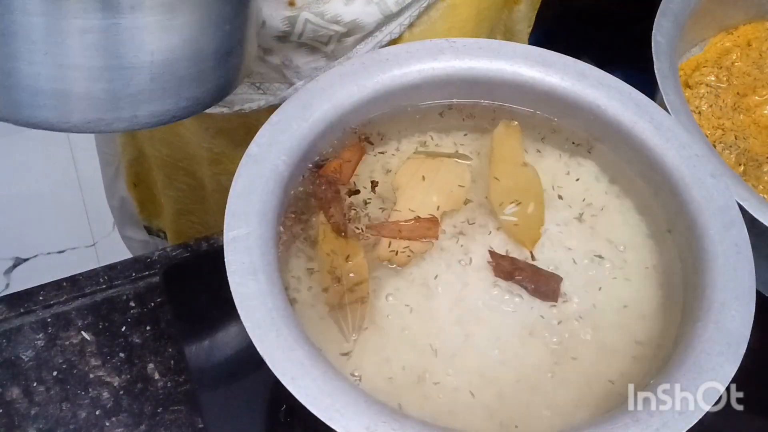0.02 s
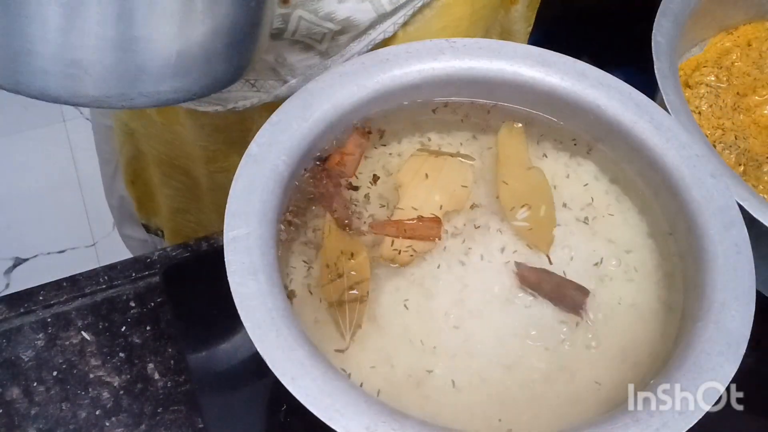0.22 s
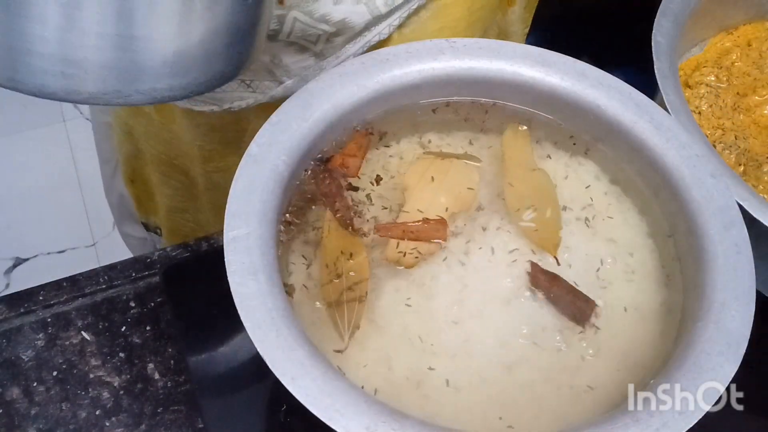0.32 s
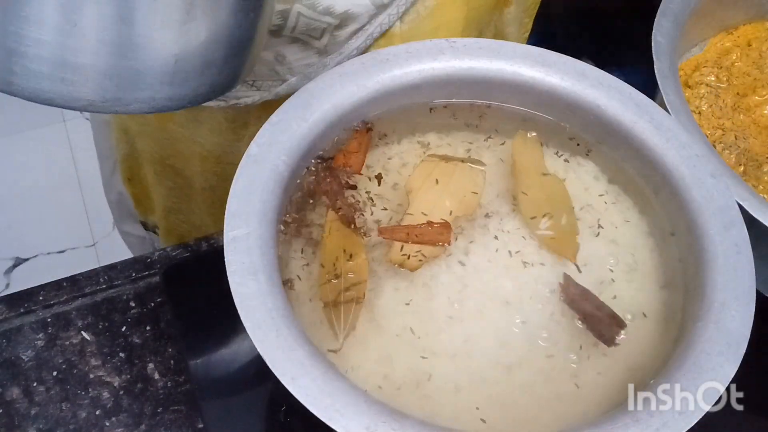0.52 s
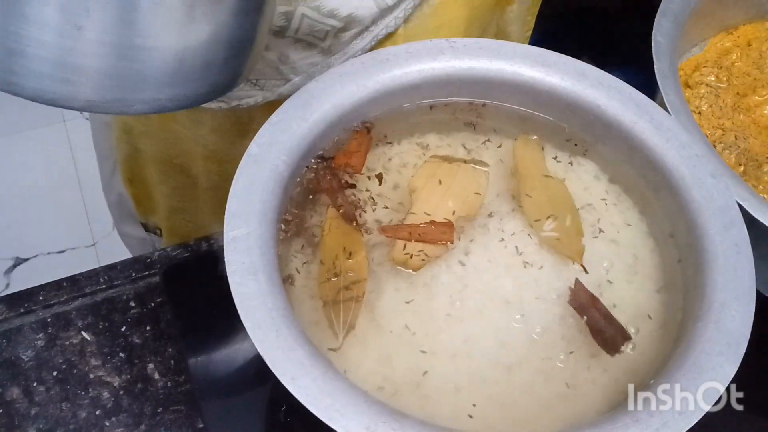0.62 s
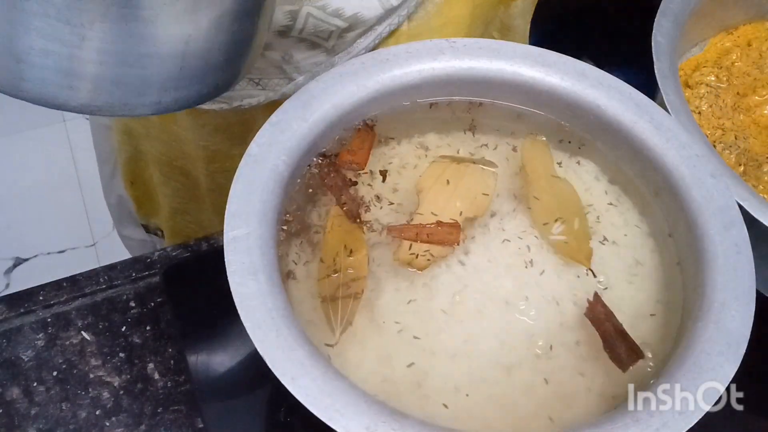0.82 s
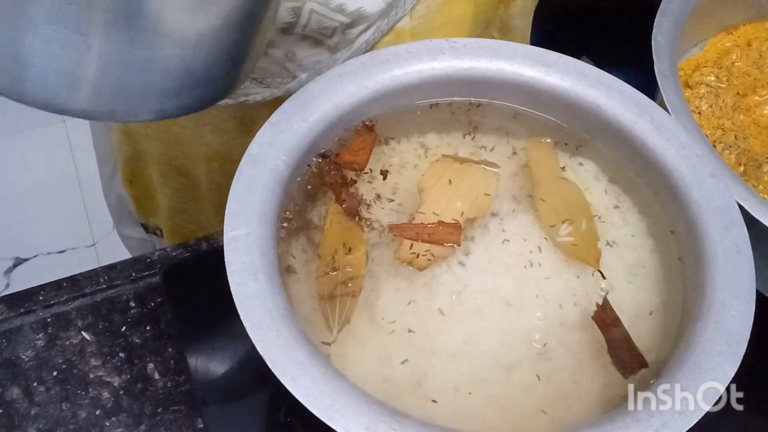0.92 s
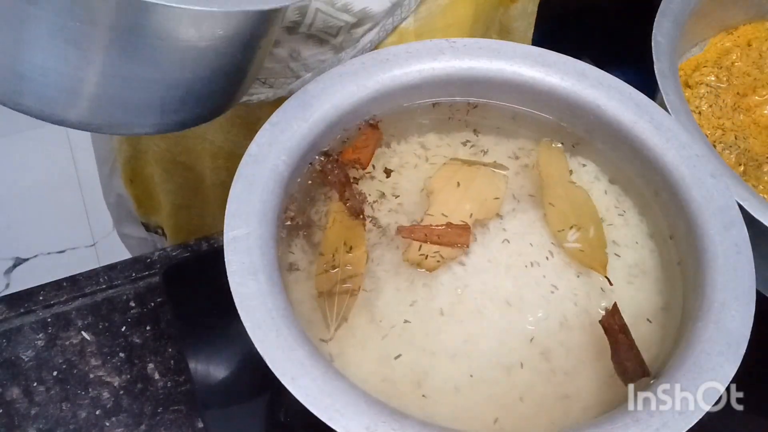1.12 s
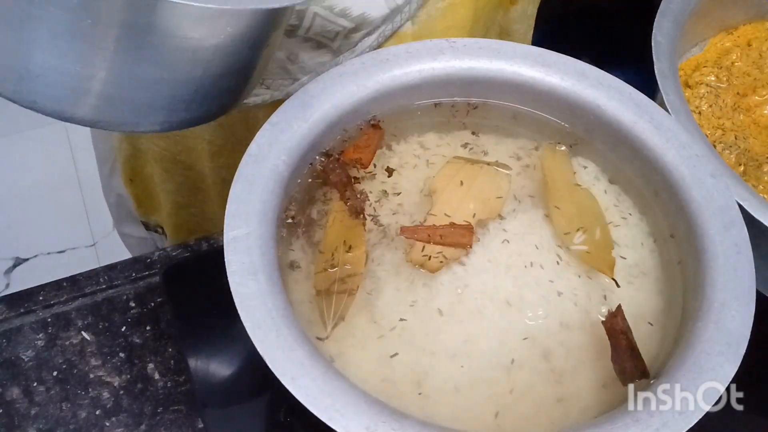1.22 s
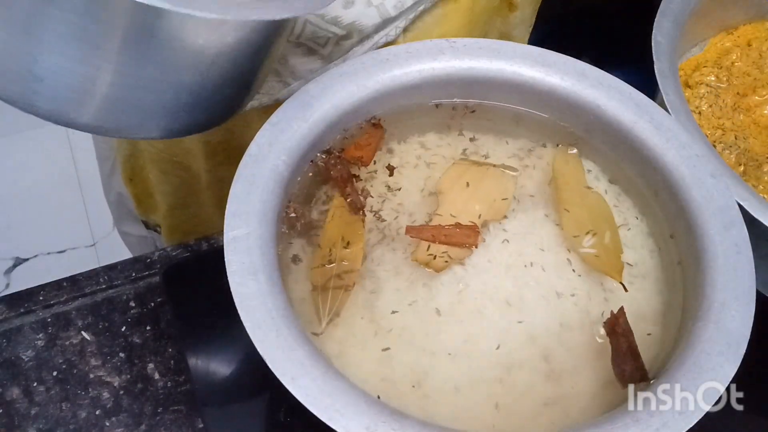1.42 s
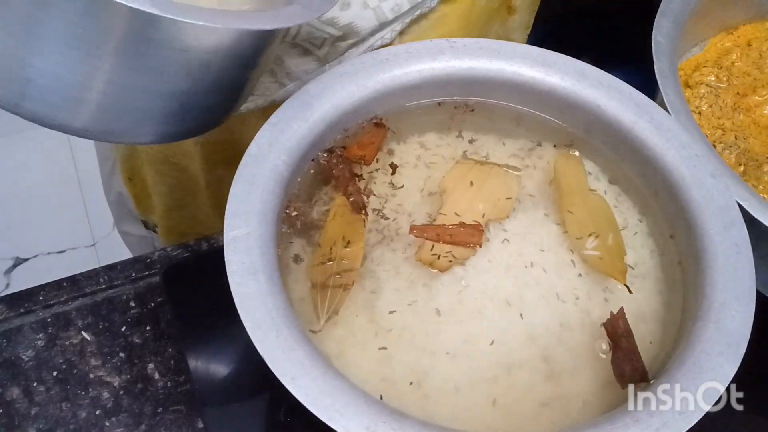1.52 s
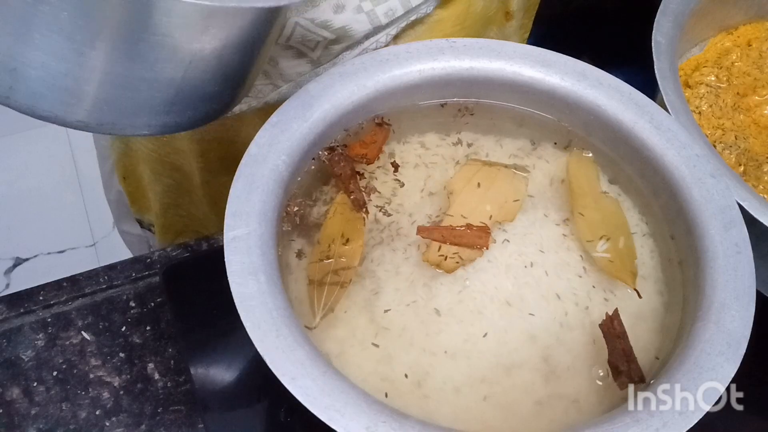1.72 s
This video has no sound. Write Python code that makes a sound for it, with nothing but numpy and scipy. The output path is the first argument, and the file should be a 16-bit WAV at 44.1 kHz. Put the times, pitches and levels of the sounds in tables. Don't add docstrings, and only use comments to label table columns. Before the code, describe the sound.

Metal pot knocked and dragged across a stone worktop, ringing briefly over a low throbbing rumble

```python
import sys
import numpy as np
from scipy import signal
from scipy.fft import rfft, irfft
from scipy.io import wavfile
from scipy.ndimage import uniform_filter1d

SR = 44100
rng = np.random.default_rng(int(sys.argv[2]) if len(sys.argv) > 2 else 0)


def elevation(decibels):
    levels = np.asarray(decibels, float)
    return 10 ** (levels / 20)


def wrap_up_sound(samples):
    columns = np.atleast_2d(samples).T
    tamed = np.clip(columns, -1, 1)
    steps = np.round(tamed * 32767).astype(np.int16)
    wavfile.write(sys.argv[1], SR, steps)


N = 79380


def even(x):
    return x / np.sqrt(np.mean(x ** 2) + 1e-20)


def read(points, hz):
    f, value = np.transpose(points)
    return np.interp(np.log(hz + 1), np.log(f + 1), value)


def add(mix, start_s, sound):
    part = mix[..., round(start_s * SR):][..., :sound.shape[-1]]
    part += sound[..., :part.shape[-1]]


def colour(x, points):
    log_gain = read(points, abs(np.fft.fftfreq(4096, 1 / SR))) * np.log(10) / 20
    taps = np.fft.ifft(np.exp(np.conj(signal.hilbert(log_gain)))).real[:2048]
    return signal.fftconvolve(x, taps)[:len(x)]


def resonate(x, hz, width_hz):
    turn = np.exp(2j * np.pi * np.cumsum(hz * np.ones(len(x))) / SR)
    r = np.exp(-np.pi * abs(width_hz) / SR)
    return 2 * (turn * signal.lfilter([1 - r], [1, -r], x / turn)).real


# pitch_hz, correlation [-1 to 1]
LIKENESS = [(60, 0.99), (300, 0.88), (640, 0.62), (1400, -0.087), (3000, -0.054)]


def pair(a, b):
    same = np.clip(read(LIKENESS, np.fft.rfftfreq(len(a), 1 / SR)), -1, 1)
    right = irfft(same * rfft(a) + np.sqrt(1 - same ** 2) * rfft(b), len(a))
    return np.array([a, right])


# pitch_hz, t60_s
ROOM_DECAY = [(200, 0.6), (600, 0.41), (1500, 0.51), (4000, 0.43), (9000, 0.32), (15000, 0.21)]


def kitchen(x, wet_db):
    taps = np.zeros((2, SR))
    at = np.arange(60, SR - 20, 20) + rng.integers(0, 20, (2, (SR - 61) // 20))
    np.put_along_axis(taps, at, rng.choice([-1., 1.], at.shape), 1)
    hz, t, bands = signal.stft(pair(*taps), SR, nperseg=128)
    decay = elevation(-60 * t / read(ROOM_DECAY, hz)[:, None])
    tail = signal.istft(bands * decay, SR, nperseg=128)[1]
    tail[:, :60] = 0
    tail = tail / np.linalg.norm(tail[0])
    walls, size = rng.integers(40, 1300, size=8), rng.uniform(-1, 1, size=8)
    for ear in tail:
        ear[walls + rng.integers(0, 16, size=8)] += elevation(-15 - walls / 80) * size
    left_lag_s = 0.00022
    tail[0, round(left_lag_s * SR)] += elevation(-wet_db)
    tail[1, 0] += elevation(-wet_db)
    return signal.fftconvolve(x[None], tail, axes=1)[:, :N]


# pitch_hz, density_db [dB per Hz]
ROOM_TONE = [(30, 6), (81, 1.5), (600, -15), (1800, -24), (2400, -36), (3680, -30), (8500, -30),
             (12500, -25), (15500, -32)]
# time_s, pitch_hz, level_db
WHISTLE = [
    (0., 1537, -64.5),
    (.1, 1516, -69),
    (.2, 1640, -60.5),
    (.6, 1670, -86),
    (.67, 1850, -58.5),
    (1.4, 1740, -69),
    (1.6, 1900, -82),
    (1.8, 1890, -70),
]


def air():
    tone_a, tone_b, lump_a, lump_b, jet_a, jet_b = rng.standard_normal((6, N))
    t = np.arange(N) / SR
    tone = elevation(-55.5) * even(pair(colour(tone_a, ROOM_TONE), colour(tone_b, ROOM_TONE)))

    rumble_hz, rumble_width_hz = 78.6, 37
    lumps = [resonate(resonate(v, rumble_hz, rumble_width_hz), rumble_hz, 33) for v in (lump_a, lump_b)]
    rumble = elevation(-58) * (np.sin(2 * np.pi * rumble_hz * t) + 0.22 * even(pair(*lumps)))
    throb_db = 5 * np.cos(2 * np.pi * 5.12 * (t - 0.29))
    quiet_start_db = -10 * np.clip((0.26 - t) * 20, 0, 1)
    rumble *= elevation(throb_db + quiet_start_db + 5 - 5.5 * t)

    time_s, pitch_hz, level_db = np.transpose(WHISTLE)
    path = np.interp(t, time_s, pitch_hz)
    whistle = even(np.array([resonate(resonate(v, path, 92), path, 270) for v in (jet_a, jet_b)]))
    return tone + rumble + elevation(np.interp(t, time_s, level_db)) * whistle


# start_s, level_db, pitch_hz, width_hz, length_s
TICKS = [(0., -82.5, 3450, 1210, 0.0059), (0.168, -76.5, 3900, 2400, 0.012),
         (0.408, -67, 4600, 5130, 0.0025), (0.773, -48.5, 11600, 6000, 0.0012),
         (0.8075, -45, 7450, 9000, 0.0015), (0.968, -54.5, 6900, 9900, 0.0006),
         (1.337, -63, 10100, 6200, 0.0027), (1.457, -67.5, 6000, 4000, 0.0065),
         (1.467, -64.5, 1700, 1340, 0.0067), (1.567, -68.5, 6000, 7000, 0.003),
         (1.574, -71.5, 650, 310, 0.0032), (1.624, -66, 2130, 1260, 0.018), (1.747, -76, 1990, 410, 0.0062)]


def tick(level_db, pitch_hz, width_hz, length_s):
    t = np.arange(SR // 2) / SR
    noise = rng.standard_normal(len(t)) * t * np.exp(-t / length_s)
    puff = resonate(noise, pitch_hz, width_hz)
    return elevation(level_db) * even(resonate(puff, pitch_hz, 2 * width_hz))


def chirp():
    t = np.arange(SR // 4) / SR
    pitch_hz = 3610 + 500 * np.exp(-t / 0.012)
    fade = np.minimum(t / 0.025, 1) * elevation(-68 - 60 * t / 0.19)
    return fade * np.sin(2 * np.pi * np.cumsum(pitch_hz) / SR)


# start_s, level_db, rattle_s, ring_db, room_db, rattle_db
BLOWS = [
    (0.2182, -35, 0.0041, -9.5, 5, -12.5),
    (0.6751, -40, 0.0021, -9.5, 6, -4.5),
    (0.7532, -33, 0.0053, -5, 10, -14),
]
# pitch_hz, density_db [dB per Hz]
CRACKS = [
    [(120, -79), (200, -22), (450, -10), (1100, -20.5), (1510, -13), (2510, -16.5), (4100, -7.5),
     (15500, -9)],
    [(120, -48), (200, -33), (575, -22.5), (665, -2.5), (812, -35), (1510, -10.5), (1880, -19.5),
     (15500, -13.5)],
    [(120, -25.5), (200, -24.5), (471, -8.5), (596, -17.5), (677, 4.5), (842, -15), (1620, -12),
     (15500, -16.5)],
]
# pitch_hz, level_db, t60_s
RINGS = [
    [(660, 7.5, 0.35), (870, 4.5, 0.32), (1330, 0, 0.44), (1517, 16, 0.15), (1760, 9, .1), (2335, 13, 0.14),
     (3601, 13.5, .25), (3730, 4, 0.14), (4090, 10, 0.3), (4580, 10, 0.18), (4800, 15, .15),
     (5450, 12, 0.19)],
    [(450, 7.5, 0.14), (624, 0, 0.29), (1078, 20, 0.066), (1500, 13.5, 0.18), (3040, 7, .2),
     (4118, -10, .12), (5370, -9, .12), (5900, 17, 0.071)],
    [(332, 9, 0.12), (686, 18, 0.17), (668, -1, 0.58), (956, 4, 0.52), (1190, 6, 0.37), (1359, 10, 0.4),
     (1525, -1.5, 0.42), (1630, 15.5, 0.22), (2410, 2.2, 0.5), (2600, 7, .15), (2952, 11.5, .12),
     (4035, -2, 0.34)],
]


def blow(level_db, rattle_s, ring_db, room_db, rattle_db, crack, ring):
    t = np.arange(SR // 2) / SR
    contact = kitchen(even(colour(1. * (t == 0), crack)), room_db)

    rattles_per_s, close_db = 5500, -15
    draw = rng.random((len(t), 2))
    hits = (draw[:, 0] < rattles_per_s / SR) * (2 * draw[:, 1] - 1) * np.exp(-t / rattle_s)
    rattle = elevation(rattle_db + close_db) * kitchen(even(colour(hits, crack)), close_db)

    modes = np.zeros(len(t))
    for pitch_hz, mode_db, t60_s in ring:
        waver = 1 + 0.35 * even(uniform_filter1d(rng.standard_normal(len(t)), size=500))
        modes += elevation(mode_db - 60 * t / t60_s) * np.sin(2 * np.pi * pitch_hz * t) * waver
    ring_wet_db = -4
    ringing = elevation(ring_db + ring_wet_db) * even(modes * np.minimum(t / 0.0014, 1))
    return elevation(level_db) * (contact + rattle + kitchen(ringing, ring_wet_db))


# time_s, pressure_db, floor_weight_db, hollow_hz [air under the pot]
DRAGS = [
    [(.325, -64, 18, 450), (.35, -54.5, 8, 480), (.39, -45.5, 7.5, 910), (.415, -31, -4.5, 1080),
     (.44, -47, -47, 1490), (.47, -33.5, -4, 1320), (.5, -111, -15, 970), (.54, -108, 4, 960)],
    [(.967, -37.5, -1, 1180), (.975, -43, -6.5, 1190), (1.04, -40.5, -7.5, 1520), (1.1, -44.5, -6, 1540),
     (1.14, -41.5, -5, 1250), (1.19, -42, -4, 1674), (1.225, -40.5, 8.5, 1415), (1.31, -45, -5.5, 1650),
     (1.36, -71, -28, 1500)],
]
# pitch_hz, width_hz, level_db
FLOORS = [
    [(277, 20, -9), (328, 14, -3.5), (530, 26, -3), (687, 25, 1), (751, 25, -6.5)],
    [(472, 19, -8.5), (528, 44, -7), (578, 63, -6.5), (637, 40, -3), (720, 97, -6.5)],
]
# pitch_hz, width_hz, level_db
WALLS = [
    [(934, 26, -6), (1030, 51, 5.8), (1230, 19, 2), (1335, 115, 4.5), (1510, 18, -11), (1752, 22, 5),
     (2400, 17, -6), (2915, 120, 1)],
    [(1072, 80, -4.5), (1254, 34, -2.5), (1400, 51, 1.5), (1580, 80, 10), (1710, 79, 1), (2310, 41, 3),
     (2800, 60, -9)],
]
# pitch_hz, density_db [dB per Hz]
GRIT = [
    [(120, -59), (200, -31), (665, -21.5), (842, -10.5), (1380, -15.5), (4920, -20.5), (15500, -28.5)],
    [(120, -44), (200, -36), (554, -8), (728, -30), (842, -13), (1380, -8.5), (15500, -25)],
]


def drag(curve, floor, wall, grit):
    time_s, pressure_db, weight_db, hollow_hz = np.transpose(curve)
    t = np.arange(N) / SR
    slips_per_s, spread_db = 2700, 4.5
    draw = rng.random((N, 3))
    strength = (draw[:, 2] + .03) ** (-spread_db / 20 * np.log(10))
    slips = even((draw[:, 0] < slips_per_s / SR) * np.sign(draw[:, 1] - .5) * strength)
    slips = slips * elevation(np.interp(t, time_s, pressure_db, -150, -150))

    unit = np.zeros(N)
    unit[0] = 1
    bodies = []
    for modes in (floor, wall):
        bodies.append(sum(elevation(d) * (-1) ** k * resonate(unit, f, w) for k, (f, w, d) in enumerate(modes)))
    low, high, rasp = (h / np.linalg.norm(h) for h in bodies + [colour(unit, grit)])
    floor_ring = signal.fftconvolve(slips * elevation(np.interp(t, time_s, weight_db)), low)
    wall_ring = signal.fftconvolve(slips, high + elevation(1.5) * rasp)
    hollow = elevation(12) * resonate(slips, np.interp(t, time_s, hollow_hz), 47)
    return (floor_ring + wall_ring)[:N] + hollow


def shifting(x, wet_db):
    turn = np.pi * np.arange(N) / SR / 0.3017
    return sum(kitchen(x * abs(np.cos(turn + k * np.pi / 3)), wet_db) for k in range(3))


# start_s, level_db, pitch_hz, swell_s
CATCHES = [(0.333, -62, 277, 0.02), (.39, -75, 328, 0.0091), (.4, -41, 646, 0.016), (.4, -36, 530, 0.018),
           (0.399, -55, 1030, 0.013), (0.408, -49, 1765, 0.019), (.47, -47, 910, 0.027),
           (.46, -69, 1230, .012), (.885, -44, 668, 0.01), (0.812, -34, 1520, 0.017),
           (1.025, -40, 1595, 0.0084), (1.05, -41.5, 528, 0.016), (1.225, -47, 1315, .01),
           (1.2, -51, 708, 0.013), (1.22, -39, 642, 0.014), (1.25, -64, 604, 0.012),
           (1.29, -81, 1560, 0.014), (1.3, -41, 692, 0.015)]


def catch(level_db, pitch_hz, swell_s):
    u = np.arange(SR // 4) / SR / swell_s
    return elevation(level_db) * u * np.exp(1 - u) * np.sin(2 * np.pi * pitch_hz * swell_s * u)


def scene():
    mix = air()
    small = np.zeros(N)
    for start_s, *how in TICKS:
        add(small, start_s, tick(*how))
    mix += kitchen(small, 1.5)
    add(mix, 0.064, kitchen(chirp(), -19) * elevation([[-2], [-8]]))
    for (start_s, *how), crack, ring in zip(BLOWS, CRACKS, RINGS):
        add(mix, start_s, blow(*how, crack, ring))
    for parts in zip(DRAGS, FLOORS, WALLS, GRIT):
        mix += elevation(-2.5) * shifting(drag(*parts), 4.5)
    rung = np.zeros(N)
    for start_s, *how in CATCHES:
        add(rung, start_s, catch(*how))
    return mix + elevation(-4) * kitchen(rung, -4)


# pitch_hz, gain_db
LEFT_MIC = [(70, 0.5), (150, -1.6), (700, -1.3), (1500, 3.5), (5000, 4.5), (7200, 2), (8600, -19.5),
            (10500, -3.5)]
# pitch_hz, gain_db
RIGHT_MIC = [(60, -6), (200, -5), (1500, 0), (5000, -0.5), (8600, -3.5), (15000, -0.5)]
# pitch_hz, gain_db
BAND_LIMITS = [(36, -25), (48, 0.), (15650, 0.), (15850, -36), (17200, -50)]


def microphones(dry):
    left = colour(colour(dry[0], LEFT_MIC), BAND_LIMITS)
    right = colour(colour(dry[1], RIGHT_MIC), BAND_LIMITS)
    return np.array([left, right])


def band_limit(x):
    return signal.sosfilt(signal.butter(12, 17010, fs=SR, output="sos"), x)


def record(dry):
    heard = microphones(dry)
    return band_limit(heard)


dry = scene()
out = record(dry)
wrap_up_sound(out)
```